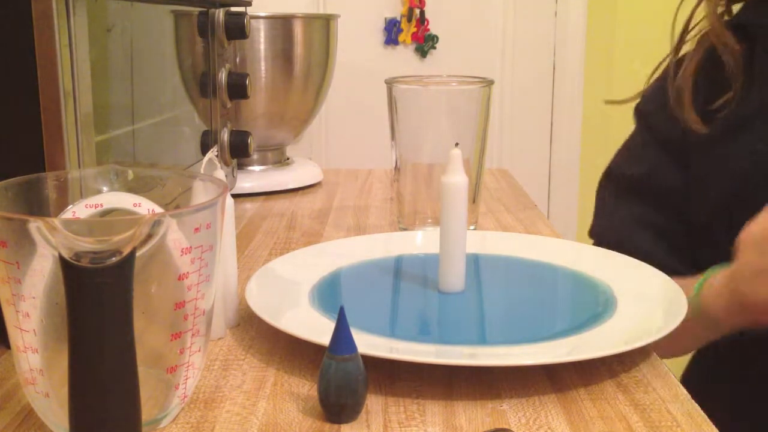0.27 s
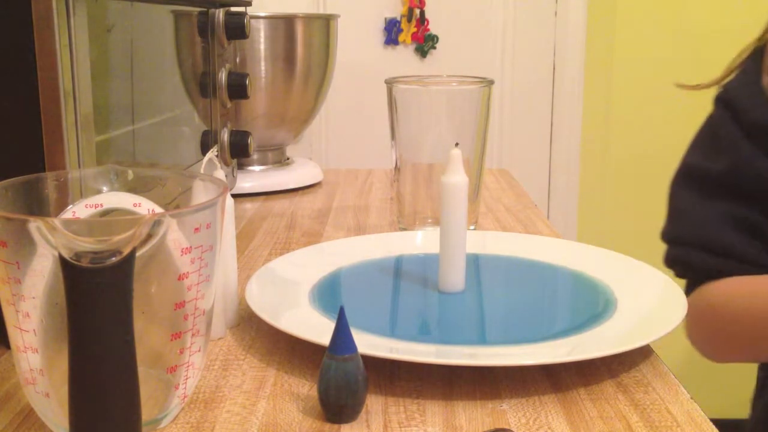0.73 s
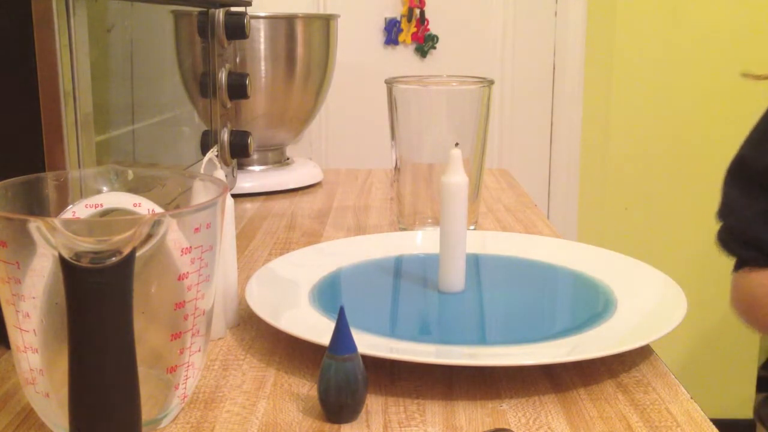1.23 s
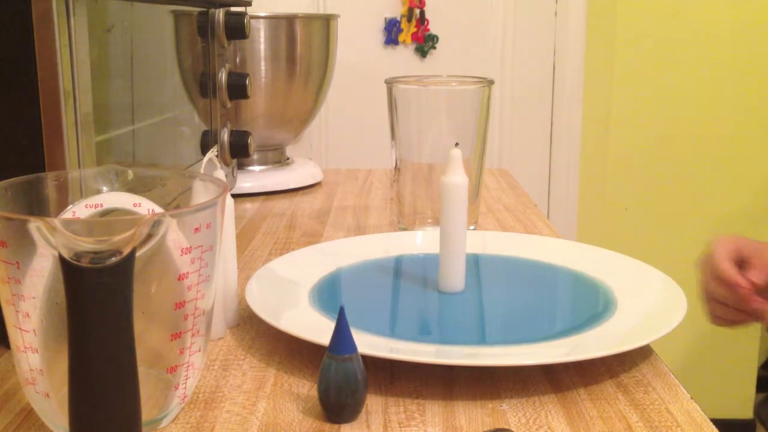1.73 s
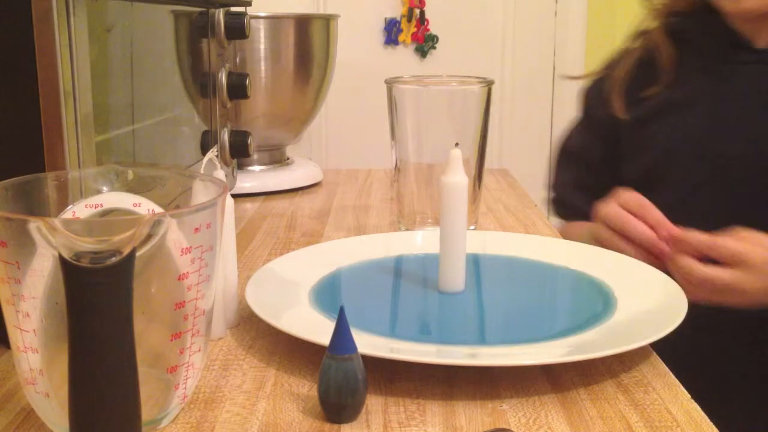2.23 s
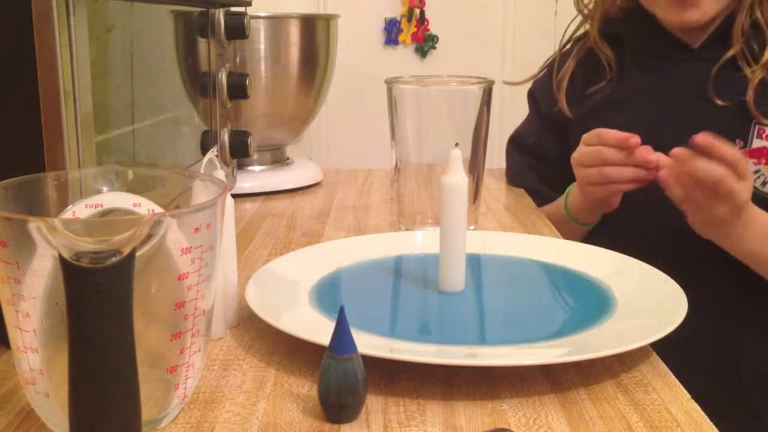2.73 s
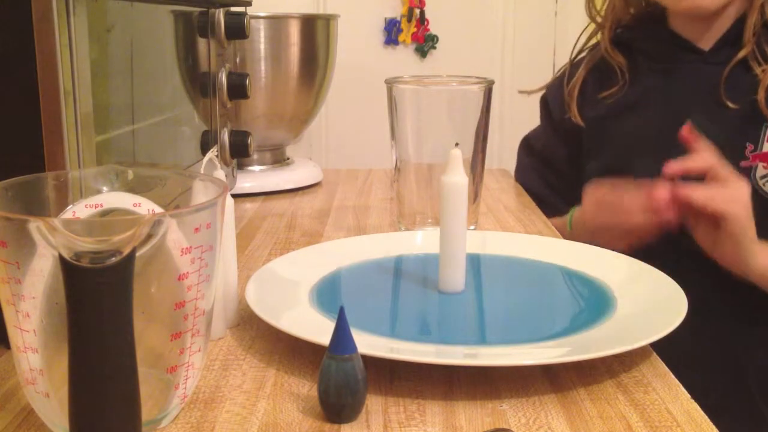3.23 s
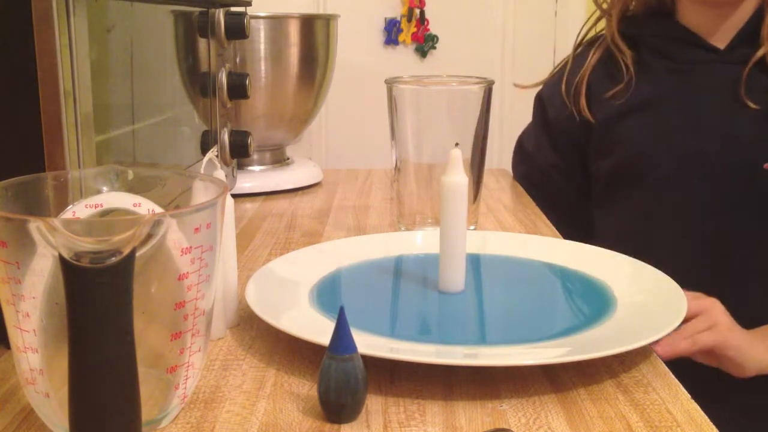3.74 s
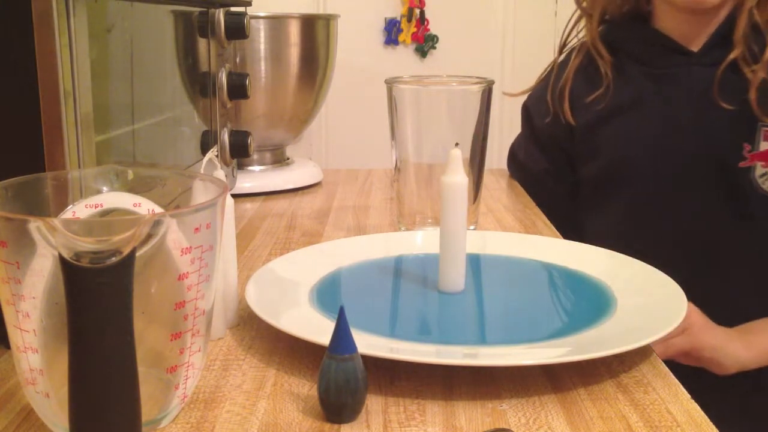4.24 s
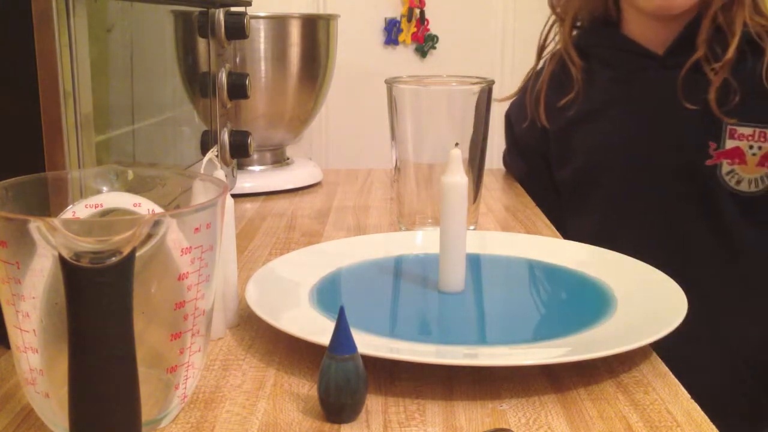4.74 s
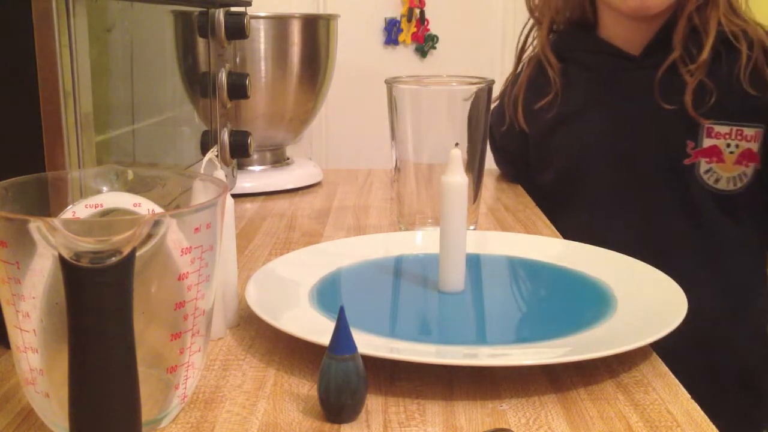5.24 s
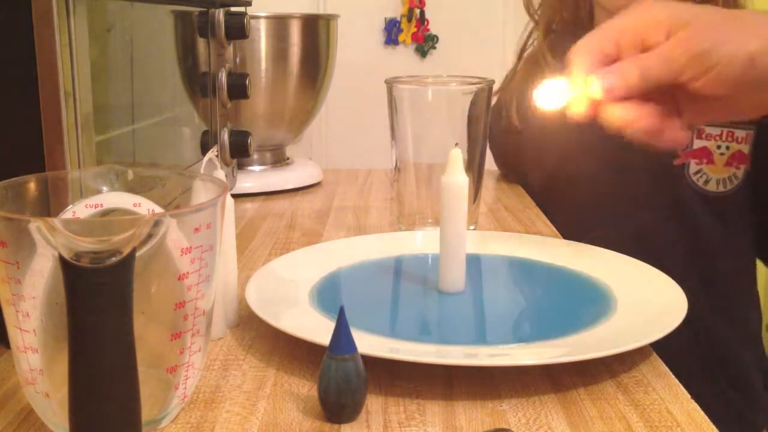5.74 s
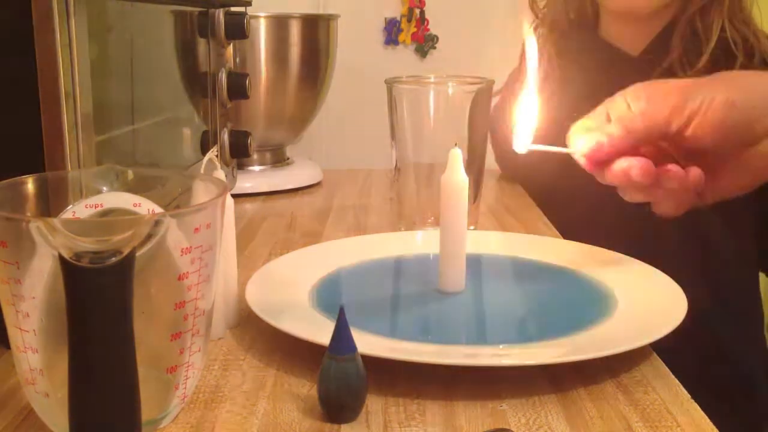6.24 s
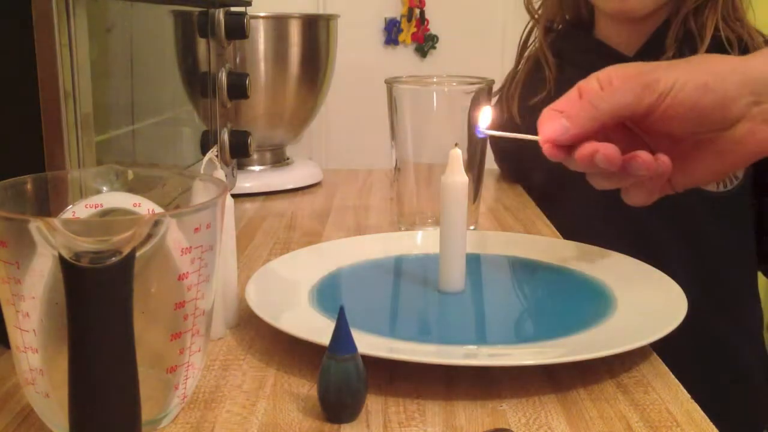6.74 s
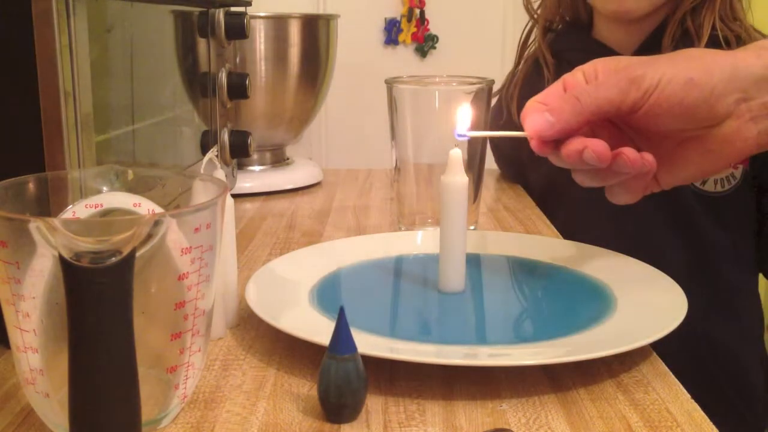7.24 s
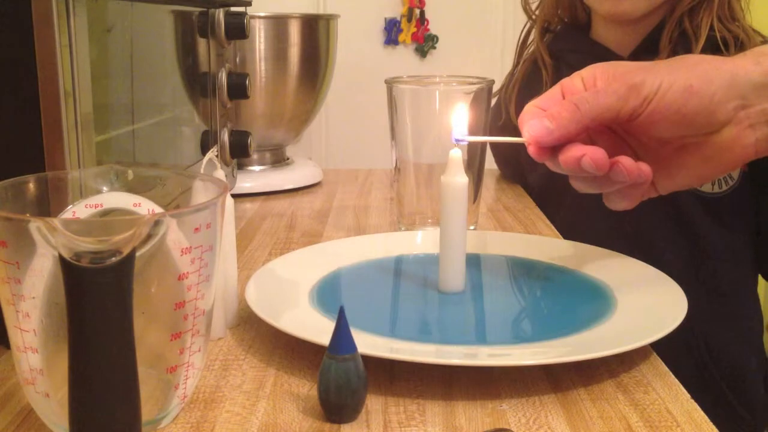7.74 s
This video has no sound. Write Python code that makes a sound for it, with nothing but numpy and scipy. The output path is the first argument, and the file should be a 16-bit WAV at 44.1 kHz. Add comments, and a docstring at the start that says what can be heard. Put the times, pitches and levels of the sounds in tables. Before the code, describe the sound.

Matchbox card clicks, slides and rustles in a quiet kitchen, then one match scratches, pops alight, hisses briefly and flutters softly.

```python
"""In a quiet kitchen a matchbox is handled: card and sticks click, slide and rustle.
One match is dragged over the striker, catches with pops and flares with a hiss and a brief
whistle, then its flame flutters softly. Knocks are sharp pulses, rubbing is a stream of tiny
slips, and fire and air are made of noise. Filters give each its colour. The table top echoes
all but the flame, the walls echo it too, and a rumble, thin hiss and faint hum lie beneath."""
import sys
import numpy as np
from scipy import signal
from scipy.io import wavfile
from scipy.ndimage import uniform_filter1d

SR = 44100
rng = np.random.default_rng(int(sys.argv[2]) if len(sys.argv) > 2 else 0)


def log_audio(samples):
    """Write samples as a 16-bit WAV file to the path given in sys.argv[1]."""
    # one column per channel
    frames = np.atleast_2d(samples).T
    # limit to full scale, then quantise
    limited = np.clip(frames, -1, 1)
    pcm = np.round(limited * 32767).astype(np.int16)
    wavfile.write(sys.argv[1], SR, pcm)


N = 351918
TIME = np.arange(N) / SR  # seconds
BINS = np.fft.rfftfreq(4096, 1 / SR)  # the pitches, in Hz, at which colours are worked out
EDGE_HZ = 15450  # upper limit of the sound
LEAST_LIFT_DB = 6.5  # least basic lift of a favoured pitch

# All level_db columns are relative levels, before the layers are mixed.
# Soft rubs of card, the first a short slide as the sound begins: start_s [s], length_s [s],
# level_db [dB], favoured pitch_hz [Hz], tilt_db [dB per octave, plus is brighter]
RUBS = [(0.0, 0.016, -51, 2770, -1.5), (0.2, 0.25, -63, 4060, 0.5), (1.431, 0.21, -61.5, 3400, -0.5),
        (1.689, 0.3, -62.5, 3400, -0.3), (2.073, 0.11, -53.5, 4500, 0), (2.189, 0.27, -63.5, 4050, 0),
        (2.62, 0.14, -69, 3500, -1), (2.75, 0.11, -58.5, 4500, 1), (2.827, 0.036, -54.5, 790, -1),
        (3.47, 0.27, -63, 1930, -0.5), (3.883, 0.07, -59.5, 2200, -1.5), (4.129, 0.27, -67.5, 2830, -0.5),
        (4.404, 0.14, -60, 2100, -2.5), (4.829, 0.35, -77.5, 1940, -2.5)]
# A standing wave between the walls: pitch_hz [Hz], width_hz [Hz], level_db [dB]
ROOM_MODE = [(196, 13.5, 5.5)]


def amp(db):
    """Turns decibels into a gain."""
    return 10 ** (np.asarray(db) / 20)


def evened(x):
    """Scales to an average (rms) strength of one."""
    return x / np.sqrt(np.mean(x ** 2) + 1e-20)


def read(points, hz):
    """Reads between the points of a curve, with pitch spaced as in octaves."""
    f, value = np.transpose(points)
    return np.interp(np.log(hz + 1), np.log(f + 1), value)


def follow(points):
    """Reads a curve of (time, value) points at every moment, with straight lines between them."""
    return np.interp(TIME, *np.transpose(points))


def envelope(start_s, attack_s, hold_s, decay_s):
    """Gain over time: a straight rise, a hold and a fading tail."""
    age = TIME - start_s
    fade = np.exp(-np.maximum(age - attack_s - hold_s, 0) / decay_s)
    return np.clip(age / attack_s, 0, 1) * fade


def add(mix, s, sound):
    """Mixes a sound in at time s."""
    part = mix[max(round(s * SR), 0):][:len(sound)]
    part += sound[:len(part)]


def peaks(modes):
    """The bumps, in dB, that a set of resonances adds to a colour."""
    return sum(db / (1 + (2 * (BINS - hz) / width) ** 2) for hz, width, db in modes)


def octaves(hz):
    """Distance of every bin from hz, in octaves."""
    return np.log2(np.maximum(BINS, 100) / hz)


def ring(drive, colour_db):
    """Sounds a drive through a body of this colour, which rings only after it is hit; energy is kept."""
    log_gain = np.log(amp(np.maximum(colour_db, colour_db.max() - 80)))
    circle = np.concatenate([log_gain, log_gain[-2:0:-1]])
    # The matching phase places the response after the blow, as early as it can be.
    response = np.fft.ifft(np.exp(np.conj(signal.hilbert(circle)))).real
    out = signal.oaconvolve(drive, response)
    return out * np.linalg.norm(drive) / (np.linalg.norm(out) + 1e-20)


def resonate(x, hz, width_hz):
    """A resonance that follows the pitch curve hz: shift that pitch to zero, smooth, shift back."""
    turn = np.exp(2j * np.pi * np.cumsum(hz) / SR)
    r = np.exp(-np.pi * width_hz / SR)
    smooth = signal.lfilter([1 - r], [1, -r], x / turn + 1e-18)
    return 2 * (turn * smooth).real


def grains(count, per_s, spread_db):
    """Tiny slips or bursts at random moments, of random sign and size."""
    size = amp(spread_db * np.minimum(rng.exponential(1, count), 4))
    happens = rng.random(count) < per_s / SR
    return evened(size * rng.choice([-1, 1], count) * happens)


def crack(decay_s, count):
    """One sharp release, as strong as 2 ms at unit level; each fibre holds back its own pitch a little."""
    hz = (np.arange(count) + rng.random(count)) * EDGE_HZ / count
    r = np.exp(-1 / (decay_s * SR))
    drive = signal.unit_impulse(SR // 40)
    for a in -2 * r * np.cos(2 * np.pi * hz / SR):
        drive = signal.lfilter([r * r, a, 1], [1, a, r * r], drive)  # delays without changing loudness
    return drive * np.sqrt(SR / 500)


def room_air():
    """Steady ventilation rumble and thin hiss: noise given the colour of the room."""
    # Background colour: pitch_hz [Hz], level_db [dB per Hz, relative]
    quiet = [(15, -59.5), (25, -41), (113, -9.5), (152, -5.5), (246, -4.5), (322, -7), (359, -6.5),
             (433, -11), (495, -13), (741, -16.5), (871, -18), (1200, -22), (4870, -18), (14300, -23),
             (15500, -23)]
    air = ring(rng.standard_normal(N), read(quiet, BINS) + peaks(ROOM_MODE))[:N]
    return amp(-65.5) * evened(air)


def appliance_hum():
    """A faint appliance hum: a few steady pure tones."""
    # Hum tones: pitch_hz [Hz], level_db [dB, relative]
    tones = [(242.2, -83.5), (360.7, -83), (511.4, -87.5)]
    hum = np.zeros(N)
    for hz, db in tones:
        hum += amp(db) * np.sqrt(2) * np.sin(2 * np.pi * (hz * TIME + rng.random()))
    return amp(-5) * hum


def lift(hz):
    """Basic lift, in dB, of a favoured pitch: low pitches of the box stand out more."""
    return max(11.5 - 7 * np.log2(hz / 2000), LEAST_LIFT_DB)  # 11.5 dB at 2 kHz, 7 dB less per octave up


def box_colour(hz, lift_db, tilt_db, width_octaves=0.2, uneven_db=1.5):
    """Each contact favours one pitch and has its own brightness, with small random unevenness."""
    # Broad colour of the card: pitch_hz [Hz], level_db [dB]
    card_colour = [(40, -37), (100, -33), (300, -18.5), (700, -17.5), (1100, -8), (2500, -3.5),
                   (4500, -1.5), (8000, -6.5), (12000, -7.5), (15500, -21)]
    # Resonances of the box: pitch_hz [Hz], width_hz [Hz], level_db [dB]
    box_modes = [(1130, 75, 2.9), (1433, 120, 8.9), (1823, 120, 5.8), (2415, 130, 6.2), (2800, 120, 8.6),
                 (3170, 70, 1.8), (3890, 200, 4.8), (4610, 86, 2.1), (5080, 180, 5.5), (5960, 330, 4.5),
                 (6940, 140, 3), (7900, 480, 1.3)]
    favoured = lift_db * np.exp(-.5 * (octaves(hz) / width_octaves) ** 2)
    rough = rng.standard_normal(len(BINS))
    uneven = evened(uniform_filter1d(uniform_filter1d(rough, size=70), size=50))
    body = read(card_colour, BINS) + peaks(box_modes)
    return body + favoured + tilt_db * octaves(hz) + uneven_db * uneven


def movements():
    """Lists every rub and each part of every shove: (s, length, dB, Hz, lift, tilt, shape)."""
    # Shoves of the tray, and the short rasp within the loud knock at 2.5 s: start_s [s], length_s [s],
    # level_db [dB], favoured pitch_hz [Hz], tilt_db [dB per octave], settle_s [s], settle_db [dB]
    shoves = [(0.8613, 0.0095, -32, 3220, 1.5, 0.045, -61), (2.2703, 0.0077, -39, 3030, -0.5, 0.012, -51),
              (2.4995, 0.0029, -27.5, 5140, 0.5, 0.02, -60), (3.163, 0.027, -43, 3260, 0, 0.11, -55),
              (4.005, 0.016, -35, 2230, -0.3, 0.042, -49.5)]
    # Shapes: share spent speeding up and slowing down, rise from start to end in dB
    rub_shape, push_shape, settle_shape = (0.51, -1.2), (0.26, 6), (0.31, -1.6)
    creep_s, creep_db = 0.0074, -18
    duller_db = -3  # change of tilt per octave
    for s, length, db, hz, tilt_db in RUBS:
        yield s, length, db, hz, lift(hz), tilt_db, rub_shape
    for s, length, db, hz, tilt_db, settle_s, settle_db in shoves:
        # A soft creep leads in.
        yield s - creep_s, creep_s, db + creep_db, hz, LEAST_LIFT_DB, tilt_db + duller_db, push_shape
        yield s, length, db, hz, 1.06 * lift(hz), tilt_db, push_shape
        # Past the middle comes a short, low bump.
        yield s + 0.6 * length, 0.007, db - 9.5, 1240, 4.5, -1, settle_shape
        # Then the sticks slide to rest, duller than before.
        yield s + length, settle_s, settle_db, hz, 0.63 * lift(hz), tilt_db + duller_db, settle_shape


def slides(slips_per_stroke=70, least_per_s=300):
    """Card sticks and slips on card: quick strokes rasp, slow ones crackle. Returns direct and thrown sound."""
    direct, thrown = np.zeros((2, N))
    for s, length, db, hz, lift_db, tilt_db, (taper, rise_db) in movements():
        count = int(length * SR)
        slips = grains(count, least_per_s + slips_per_stroke / length, spread_db=2.5)
        slips += 0.54 * rng.standard_normal(count)  # a soft rustle beneath the slips
        speed = signal.windows.tukey(count, taper) * amp(np.linspace(0, rise_db, count))
        slips = amp(db) * evened(slips * speed)
        add(direct, s, ring(slips, box_colour(hz, lift_db, tilt_db)))
        add(thrown, s, ring(slips, box_colour(hz, 0.78 * lift_db, tilt_db)))
    return direct, thrown


def contacts():
    """Lists the clear clicks, then ticks of loose sticks scattered through the rubs: (s, dB, Hz, tilt)."""
    # Clicks of sticks and box: start_s [s], level_db [dB], favoured pitch_hz [Hz], tilt_db [dB per octave]
    clear_clicks = [(0.017, -45, 4530, 0), (0.222, -51, 4320, 1), (0.301, -47, 4030, 3.5),
                    (1.438, -47, 3520, 3), (1.727, -47.5, 3880, 1.5), (1.7924, -40.5, 2740, 0),
                    (1.806, -43, 4500, -2.5), (1.859, -37, 6680, 5.5), (1.899, -44, 3460, 0),
                    (1.998, -41, 1900, 4), (2.088, -42.5, 3800, 3.5), (2.103, -35, 3880, 1.5),
                    (2.2736, -29, 1450, 2.1), (2.428, -42, 1900, 2.5), (2.4824, -32, 4800, 1.5),
                    (2.4999, -20, 7340, 3), (2.7844, -50, 4400, 3), (2.8315, -41, 4110, -2.5),
                    (3.552, -47.5, 1870, -5), (3.603, -45, 1890, -2), (3.7038, -46, 2140, -4),
                    (4.0135, -32, 5300, 0), (4.135, -47, 2260, -0.5)]
    ticks_per_s, tick_db, tick_spread_db = 14, 8, 2  # levels relative to the rub
    yield from clear_clicks
    for s, length, db, hz, tilt_db in RUBS:
        for place, strength in rng.random((int(length * ticks_per_s), 2)):
            level_db = db + tick_db + tick_spread_db * (2 * strength - 1)
            yield s + place * length, level_db, hz, tilt_db + 2.5


def clicks():
    """Sticks and tray knock against the box. Returns the direct sound and what is thrown to the walls."""
    direct, thrown = np.zeros((2, N))
    for s, db, hz, tilt_db in contacts():
        lift_db = 1.18 * lift(hz)
        blow = amp(db) * crack(decay_s=0.0018, count=13)
        # A random, evenly spaced ripple varies the colour of each click.
        ripple_db = 2.6 * np.cos(2 * np.pi * (BINS / rng.uniform(1100, 2200) + rng.random()))
        add(direct, s, ring(blow, box_colour(hz, lift_db, tilt_db) + ripple_db))
        add(thrown, s, amp(-6) * ring(blow, box_colour(hz, 0.89 * lift_db, tilt_db - .4)))
    return direct, thrown


def scrape():
    """The match head rasps over the grit in tiny slips, while the stick's ring climbs in pitch."""
    # The head lands softly, then digs into the grit: time_s [s], bite [0 to 1]
    bite_curve = [(5.55, 0.4), (5.553, 0.97)]
    # The stick's ring climbs along the stroke: time_s [s], pitch_hz [Hz]
    rasp_curve = [(5.545, 3080), (5.555, 3380), (5.564, 4130), (5.577, 4300)]
    # Colour of the striker: pitch_hz [Hz], level_db [dB]
    striker_colour = [(60, -61), (150, -23), (450, -19), (1000, -14), (2100, -11), (2500, -16),
                      (3000, -8.5), (4200, -1), (5200, -10.5), (12300, -12), (15500, -17)]
    # Resonances of the striker: pitch_hz [Hz], width_hz [Hz], level_db [dB]
    striker_modes = [(825, 140, -2), (1540, 110, 6), (2096, 260, 8), (2920, 180, 9)]
    bite = follow(bite_curve)
    stroke = envelope(start_s=5.5447, attack_s=0.00086, hold_s=0.029, decay_s=0.0037)
    grit = amp(-31) * stroke * grains(N, per_s=6000, spread_db=2.5)
    soft = signal.sosfilt(signal.butter(2, [1300, 6000], "bandpass", fs=SR, output="sos"), grit)
    contact = bite * grit + (1 - bite) * soft
    rough = amp(-1.5) * ring(contact, read(striker_colour, BINS) + peaks(striker_modes))[:N]
    return rough + amp(9) * resonate(grit, follow(rasp_curve), width_hz=360)


def pops():
    """The head snags and bursts alight: sharp cracks ring with the colour of a pop."""
    # Moments of snagging and bursting: start_s [s], level_db [dB], decay_s [s], tilt_db [dB per octave]
    bursts = [(5.5522, -29, 0.0006, 5), (5.5773, -19.5, 0.00073, 1.5), (5.5786, -24, 0.0011, -2.5)]
    # Colour of a pop: pitch_hz [Hz], level_db [dB]
    pop_colour = [(40, -51), (100, -36), (170, -14), (260, 0.5), (380, -7.5), (560, -6), (1050, -1),
                  (2000, -6), (4000, -0.5), (6500, -6), (10000, -9), (15500, -16)]
    # Resonances of a pop: pitch_hz [Hz], width_hz [Hz], level_db [dB]
    pop_modes = [(785, 46, 10), (1420, 180, 3), (2910, 290, 11.5), (3760, 100, 6), (4350, 114, 6),
                 (5760, 200, 10.5)]
    out = np.zeros(N)
    for s, db, decay_s, tilt_db in bursts:
        colour_db = read(pop_colour, BINS) + peaks(pop_modes) + tilt_db * octaves(1000)
        add(out, s, amp(db) * ring(crack(decay_s, count=9), colour_db))
    return out


def sputter(x, patchy_db):
    """Makes a hiss uneven: brief patches of a few hundred hertz swell and sink."""
    z = signal.stft(x, SR, nperseg=512)[2]
    patches = uniform_filter1d(rng.standard_normal(z.shape), size=7, axis=0)  # across pitch
    patches = uniform_filter1d(patches, size=6, axis=1)  # across time
    return signal.istft(z * amp(patchy_db * evened(patches)), SR, nperseg=512)[1][:N]


def flare():
    """Countless tiny gas bursts fizz from the burning head: a first burst, then a lasting jet."""
    # Colour of the hiss: pitch_hz [Hz], level_db [dB]
    hiss_colour = [(50, -39), (100, -29), (170, -4), (400, -7), (530, -11), (820, -4.5), (1000, -12),
                   (2100, -11.5), (2700, -13.5), (4200, -14), (5200, -13.5), (8000, -17), (15500, -25.5)]
    # Resonances of the hiss: pitch_hz [Hz], width_hz [Hz], level_db [dB]
    hiss_modes = [(800, 240, -2.5), (2240, 350, 3.5), (3860, 360, 6.5), (5060, 530, 6)]
    burst = amp(-43) * envelope(start_s=5.577, attack_s=0.0053, hold_s=0.002, decay_s=0.02)
    # The jet swells by 4 dB as the fire spreads round the head.
    spread = .5 + .5 * np.tanh((TIME - 5.93) / 0.035)
    jet = amp(-57.5 + 4 * spread) * envelope(start_s=5.58, attack_s=0.044, hold_s=0.59, decay_s=0.04)
    fizz = grains(N, per_s=5000, spread_db=2.0) * (burst + jet)
    hiss = ring(fizz, read(hiss_colour, BINS) + peaks(hiss_modes))[:N]
    return sputter(hiss, patchy_db=2.5)


def whistle():
    """A spurt of gas whistles: noise through two equal resonances, with some plain noise left in."""
    jet, hz = rng.standard_normal(N), np.full(N, 5070)
    tone = evened(resonate(resonate(jet, hz, width_hz=560), hz, width_hz=560))
    spurt = envelope(start_s=5.709, attack_s=0.0056, hold_s=0.0076, decay_s=0.007)
    return amp(-46) * spurt * (tone + .5 * jet)


def flutter():
    """The flame swells and pushes out soft low puffs of air, made of low-coloured noise."""
    # Puffs of the flame: start_s [s], level_db [dB]
    puffs = [(5.685, -61), (5.745, -59.5), (6.01, -52.5), (6.305, -55), (6.375, -61), (6.575, -55.5),
             (6.63, -61), (6.713, -64)]
    # Colour of a puff: pitch_hz [Hz], level_db [dB]
    puff_colour = [(50, -40.5), (110, -9), (150, 0.5), (190, 4), (235, -8.5), (280, -7.5), (400, -17.5),
                   (800, -37), (3000, -62)]
    count = int(0.051 * SR)  # 51 ms of air in each puff
    out = np.zeros(N)
    for s, db in puffs:
        air = rng.standard_normal(count) * signal.windows.tukey(count, .7)
        add(out, s, amp(db) * ring(evened(air), read(puff_colour, BINS) + peaks(ROOM_MODE)))
    return out


def table_top(x):
    """The direct sound and its first bounces off the table and dishes, as short delayed copies."""
    # First bounces: delay_s [s], share [fraction of the direct sound]
    reflections = [(.0009, 0.11), (.0023, 0.32), (.0031, .14), (.0052, 0.11)]
    out = x.copy()
    for delay, share in reflections:
        add(out, delay, share * x)
    return out


def wall_tail(build_s=0.0031, treble_loss_db=2.0, early=1.0, early_s=0.035):
    """Near walls answer first and strongest; in the later wash each band dies at its own speed."""
    # Reverberation: pitch_hz [Hz], t60_s [s for the wash to fall by 60 dB]
    fade_times = [(150, 0.19), (1000, 0.41), (3000, 0.46), (7000, 0.34), (14000, 0.25)]
    count = SR * 3 // 4
    taps = rng.choice([-1, 1], count) * (rng.random(count) < 7000 / SR)  # about 7000 echoes a second
    hz, t, z = signal.stft(taps, SR, nperseg=256)
    decay_db = -60 * t / read(fade_times, hz)[:, None]
    dull_db = treble_loss_db * hz[:, None] / 10000
    tail = signal.istft(z * amp(decay_db - dull_db), SR, nperseg=256)[1][:count]
    age = TIME[:count]
    tail = tail * (1 - np.exp(-(age / build_s) ** 2)) * (1 + early * np.exp(-age / early_s))
    return tail / np.linalg.norm(tail)


def kitchen(x, count=4, low_hz=150):
    """Overlapping short slices of the sound feed four random tails in turn, blending into a smooth wash."""
    turn = TIME / .0055  # a new slice begins every 5.5 ms
    out = np.zeros(N)
    for place in range(count):
        share = np.maximum(1 - abs((turn - place) % count - 1), 0)
        slices = x * np.sin(np.pi / 2 * share)
        out += signal.oaconvolve(slices, wall_tail())[:N]
    return signal.sosfilt(signal.butter(3, low_hz, "highpass", fs=SR, output="sos"), out)


def scene():
    """All sounds of the match, near and by way of the walls, over the quiet room."""
    background = room_air() + appliance_hum()
    card, card_thrown = slides()
    ticks, ticks_thrown = clicks()
    scratch = scrape() + pops()
    hiss = flare() + whistle()
    flame = flutter()
    near = table_top(ticks + card + scratch + hiss) + flame
    thrown = ticks_thrown + amp(-5) * card_thrown
    thrown += amp(-6) * scratch + amp(-5) * hiss + amp(-4.5) * flame
    mix = amp(-2.5) * near + amp(-2) * kitchen(thrown) + background
    return mix[None]


def record(dry):
    """The microphone sheds deep bass, then a steep filter removes the highest treble."""
    thin = signal.sosfilt(signal.butter(1, 55, "highpass", fs=SR, output="sos"), dry)
    band_limit = signal.firwin(511, EDGE_HZ, window=("kaiser", 9), fs=SR)
    return signal.oaconvolve(thin, band_limit[None], "same")


dry = scene()
out = record(dry)
log_audio(out)
```